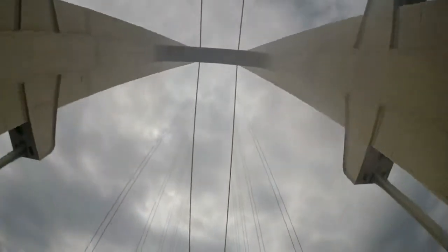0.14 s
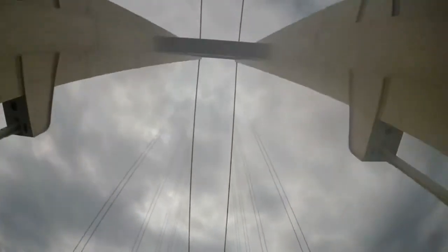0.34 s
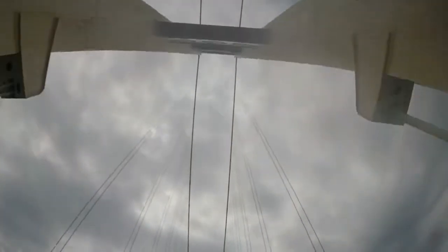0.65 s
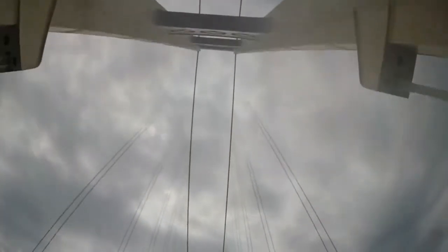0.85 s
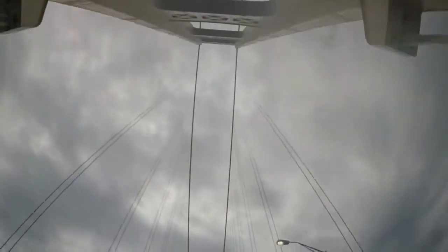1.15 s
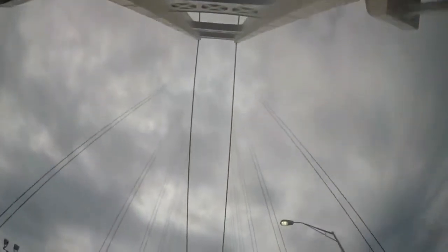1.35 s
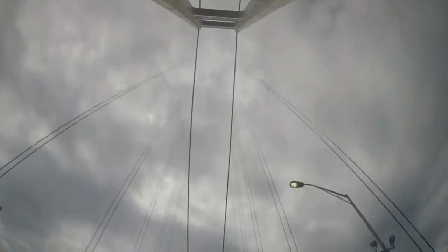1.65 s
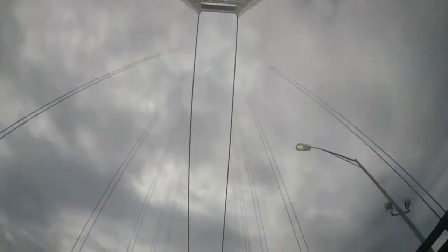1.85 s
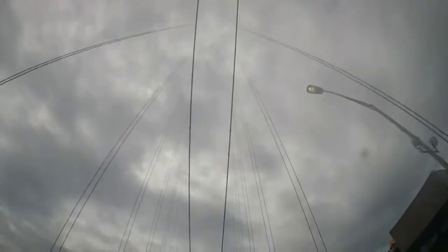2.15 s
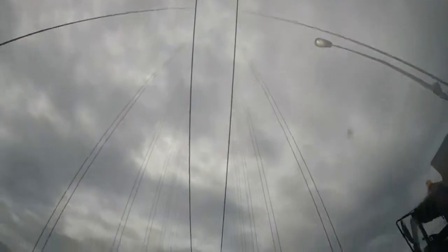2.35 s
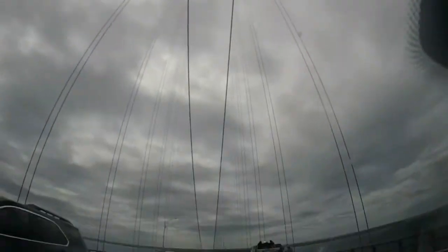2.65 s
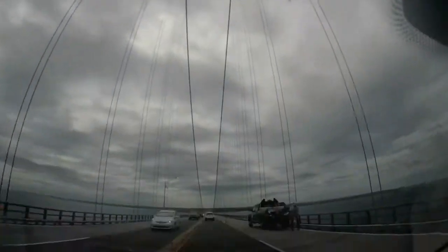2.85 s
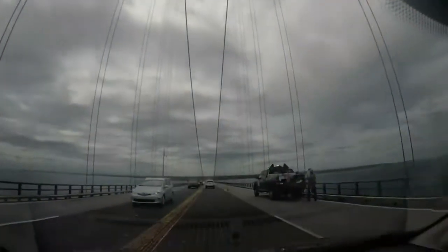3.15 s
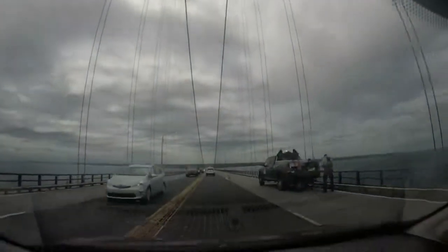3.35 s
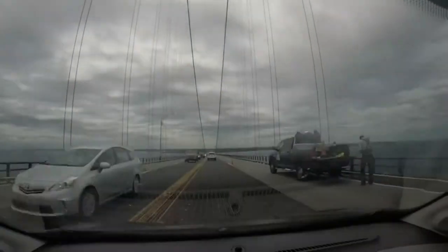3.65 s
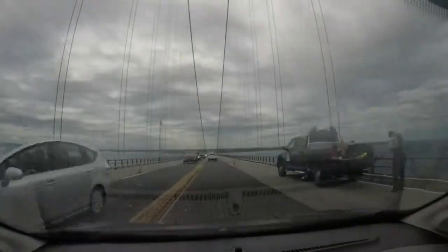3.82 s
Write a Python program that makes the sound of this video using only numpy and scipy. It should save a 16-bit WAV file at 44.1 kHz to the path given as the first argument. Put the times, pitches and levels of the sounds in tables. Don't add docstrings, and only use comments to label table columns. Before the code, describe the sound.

Low car road rumble on a bridge, heard inside the cabin, with sharp plastic clicks

```python
import sys
import numpy as np
from scipy import signal
from scipy.io import wavfile
from scipy.ndimage import uniform_filter1d

SR = 44100
rng = np.random.default_rng(int(sys.argv[2]) if len(sys.argv) > 2 else 0)


def master_out(mix):
    frames = np.transpose(np.atleast_2d(mix))
    ceiling = np.clip(frames, -1, 1)
    pcm = np.round(ceiling * 32767).astype(np.int16)
    wavfile.write(sys.argv[1], SR, pcm)


def voltage_ratio(level):
    return 10 ** (np.asarray(level, float) / 20)


N = 175518


def evened(x):
    return x / np.sqrt(np.mean(x ** 2) + 1e-20)


def curve(table, column, t):
    rows = np.array(table)
    return np.interp(t, rows[:, 0], rows[:, column])


def drift(top_hz, count):
    hz = np.geomspace(.5, top_hz, 24)[:, None]
    coarse_t = np.arange(0, N + 128, 64) / SR
    curves = []
    for _ in range(count):
        waves = np.sin(2 * np.pi * (hz * coarse_t + rng.random((24, 1)))) / np.sqrt(hz)
        curves.append(np.interp(np.arange(N) / SR, coarse_t, evened(waves.sum(0))))
    return curves


def noise(colour, lo_hz, hi_hz, patchy_db, flicker_db, size):
    frames, hz = 4 * N // size + 5, np.fft.rfftfreq(size, 1 / SR)
    real, imaginary, patches = rng.standard_normal((frames, len(hz), 3)).T
    patches = uniform_filter1d(patches, size=size // 128, axis=0)
    patches = evened(uniform_filter1d(patches, size=20, axis=1))
    flicker = evened(uniform_filter1d(rng.standard_normal(frames), size=4))
    colour_hz, colour_db = np.transpose(colour)
    shape = voltage_ratio(np.interp(np.log(hz + 1), np.log(colour_hz + 1), colour_db))
    inside = (hz >= lo_hz) & (hz <= hi_hz)
    share = np.sqrt((shape[inside] ** 2).sum() / (shape ** 2).sum())
    spectrum = (real + 1j * imaginary) * shape[:, None]
    spectrum = spectrum * voltage_ratio(patchy_db * patches + flicker_db * flicker)
    sound = signal.istft(spectrum, nperseg=size, noverlap=3 * size // 4)[1][:N]
    return evened(sound) / share


# pitch in Hz, level in dB, time to fade by 60 dB in seconds.
SHELL_TONES = [(290, -10, .015), (440, -6, 0.012), (767, 11, 0.0077), (1343, 0.5, 0.01), (1830, 9, 0.009),
               (2350, 0, 0.009), (2616, 3, 0.0096), (3350, -5, 0.011), (4420, 2.5, 0.0055),
               (5420, 1.5, 0.0053), (6770, -13.5, .006), (7900, -10.5, .004), (10130, -9.5, 0.0026),
               (12700, -29, .003)]


def shell(tilt_db, damp, shifts, top_db=0):
    t = np.arange(2600) / SR
    touch_s, top_hz = 0.00032, 6530
    ring = np.zeros(len(t))
    for k, ((hz, db, t60), shift) in enumerate(zip(SHELL_TONES, shifts)):
        tilt = tilt_db * np.log2(max(hz, 800) / 1800)
        top = top_db / (1 + (top_hz / hz) ** 8)
        fade = 60 * t / (t60 * damp)
        ring += voltage_ratio(db + tilt + top - fade) * np.sin(2 * np.pi * hz * shift * t + 3 * k)
    return (1 - np.exp(-t / touch_s)) ** 2 * ring


# time in seconds, level in dB.
HEAVE_LEVELS = [(0, -10), (.24, -9.5), (.28, -22), (.5, -15.5), (.56, -26.5), (.62, -12), (.95, -17.5),
                (1.1, -25), (1.6, -21), (1.8, -13.5), (2.0, -19), (2.5, -27), (2.7, -17), (2.85, -30.5),
                (3.2, -11.5), (3.4, -16.5), (3.56, -10), (3.7, -18.5)]
# pitch in Hz, level in dB per Hz.
THUD_COLOUR = [(15, -4), (40, 0), (70, -7), (100, -11.5), (140, -29.5), (300, -77.5)]


def heave():
    t = np.arange(N) / SR
    heave_hz, roughness, kick_db, thud_db = 25.95, 0.227, -10.5, -13
    pace, push = drift(top_hz=33.1, count=2)
    turns = 2 * np.pi * np.cumsum(heave_hz * (1 + roughness * pace)) / SR
    bounce = voltage_ratio(push) * np.sin(turns)
    kick = voltage_ratio(kick_db - 1.9 * push) * np.sin(1.7 * turns)
    thud = noise(THUD_COLOUR, 10, 200, patchy_db=2.5, flicker_db=1.0, size=2048)
    body = np.sqrt(2) * (bounce + kick) + voltage_ratio(thud_db) * thud
    return voltage_ratio(curve(HEAVE_LEVELS, 1, t) - 2) * body, push


# time in seconds, level in dB.
AIR_TOP = [(0, -11), (.45, -10), (.6, 0), (1.0, 3), (1.5, 3), (2.0, 0.5), (2.5, -4.5), (2.88, 0.5),
           (2.95, -8.5), (3.2, -14), (3.98, -16)]
# pitch in Hz, level in dB per Hz.
HISS_COLOUR = [(710, -16.5), (1200, 0), (2680, -28), (3090, -11), (4960, -18), (6680, -17), (10700, -30),
               (13000, -32), (14000, -32.5)]


def air_hiss(push):
    t = np.arange(N) / SR
    ring_db, top_hz = -8, 9500
    colour = HISS_COLOUR[:-1] + [(14500, -68.5)]
    hiss = noise(colour, 2000, 12000, patchy_db=3.0, flicker_db=0.2, size=512)
    still_shell = shell(tilt_db=-2.0, damp=1.1, shifts=np.ones(len(SHELL_TONES)))
    ringing = evened(signal.oaconvolve(hiss, still_shell)[:N])
    hiss = evened(hiss + voltage_ratio(ring_db) * ringing) * hiss.std()
    dull = signal.sosfiltfilt(signal.butter(4, top_hz, fs=SR, output="sos"), hiss)
    return dull + (hiss - dull) * voltage_ratio(curve(AIR_TOP, 1, t) + 3.3 * push)


# time in seconds, rumble in dB, tyre roar in dB, air hiss in dB.
ROAD_LEVELS = [(0.0, -38, -41, -68.5), (0.14, -30.5, -38, -61.5), (0.3, -43.5, -44.5, -70),
               (0.58, -40.5, -45, -64), (0.82, -46.5, -41.5, -57.5), (1.15, -39.5, -43.5, -62.5),
               (1.51, -34, -37, -58.5), (1.95, -31.5, -36, -52), (2.23, -34, -31, -47),
               (2.58, -31, -34, -47.5), (2.98, -32, -33.5, -49), (3.13, -28, -32.5, -50.5),
               (3.3, -31, -35.5, -54), (3.45, -35, -34, -55), (3.65, -36.5, -37, -59),
               (3.8, -34, -35, -58.5), (3.98, -33, -35.5, -65)]
# pitch in Hz, level in dB per Hz.
RUMBLE_COLOUR = [(12, -3), (35, -5.5), (70, -2), (115, -9.5), (149, -5.5), (185, -12.5), (230, -43),
                 (330, -70)]
# pitch in Hz, level in dB per Hz.
ROAR_COLOUR = [(120, -61), (200, -2.5), (420, 1.5), (457, -7.5), (602, -2.5), (802, -10.5), (1330, -13.5),
               (3500, -35), (4550, -50), (7700, -120)]


def road():
    t = np.arange(N) / SR
    body, push = heave()
    rumble = noise(RUMBLE_COLOUR + [(500, -97.5)], 120, 180, patchy_db=1.55, flicker_db=-1.64, size=4096)
    roar = noise(ROAR_COLOUR + [(6000, -95)], 330, 1500, patchy_db=1.5, flicker_db=.4, size=1024)
    out = body + voltage_ratio(curve(ROAD_LEVELS, 1, t) + 3) * rumble
    out += voltage_ratio(curve(ROAD_LEVELS, 2, t)) * roar
    return out + voltage_ratio(curve(ROAD_LEVELS, 3, t) + 0.5) * air_hiss(push)


# pitch in Hz, start in seconds, length in seconds, level in dB.
HUMS = [(148.4, 1.25, .35, -30), (149.3, 1.85, .25, -29), (150, 2.15, .8, -29),
        (243.6, 1.3, 0.69, -37.5), (299.3, 2, .3, -34.5), (189.4, 1.3, .45, -33.5),
        (1340, 3.4, .6, -50), (85.2, 0, 0.29, -28), (458, 1.98, 0.2, -36.5), (408, 2.4, 0.31, -42),
        (471, 2.25, .15, -36.5), (403, 2.9, .17, -36), (603, 1.95, .25, -43), (625, 1.3, 0.24, -42.5),
        (570, 1.75, 0.44, -44), (648, 2.1, 0.23, -43), (159, 3.3, .3, -33), (665, 2.9, 0.44, -45)]


def hums():
    out = np.zeros(N + SR)
    t = np.arange(SR) / SR
    width, edge_s = .07, .05
    shakes = rng.standard_normal((len(HUMS), 2, SR))
    for (hz, start, length, db), shake in zip(HUMS, shakes):
        r = np.exp(-np.pi * width * hz / SR)
        slow = signal.lfilter([1], [1, -2 * r, r * r], shake[0] + 1j * shake[1])
        steady = 1.2 * (hz < 700)
        tone = ((steady + slow / slow.std()) * np.exp(2j * np.pi * hz * t)).real
        swell = np.clip(np.minimum(t, length - t) / edge_s, 0, 1)
        out[round(start * SR):][:SR] += voltage_ratio(db) * evened(tone) * swell
    return out[:N]


# pitch in Hz, level in dB, time to fade by 60 dB in seconds.
MOUNT_TONES = [(1290, -37.5, .054), (2223, -35, 0.069), (3200, -40, 0.06), (4540, -41, 0.036),
               (5310, -39.5, 0.035)]
# start in seconds, peak in dB, brightness in dB per octave,
# spread of the contact in seconds, extra level above 6 kHz in dB.
SHELL_CLICKS = [(0.1501, -11, -0.5, .004, 12.5), (0.3023, 0, -5, .002, -6), (0.4087, -32.5, 0, .003, 0),
                (0.62, -29, -5, 0.0026, 6), (0.9907, 0.5, 2, 0.0023, -2), (1.265, -31, -14, .003, 0),
                (1.353, -34, -13, 0.0028, 0), (1.365, -28.5, -6, .002, 4), (1.393, -19, -7, 0.0046, -3),
                (1.419, -24, -10.5, .004, 0), (1.444, -25, -12, .004, 0), (1.462, -24, -10, 0.0023, 0),
                (1.5147, -9.5, 1, 0.0054, 4), (2.0607, -15, -6, .004, 4.5), (2.7731, -14, 2, 0.011, -0.5),
                (2.787, -26, 0, .006, 0), (1.556, -24, -7, .004, 1), (2.9099, -7.5, 4, .0015, -9),
                (2.992, -23, -2, .003, -3), (3.005, -21, -5, 0.0026, -2), (3.0203, -15, 1, .005, 0),
                (2.845, -24, 0, .006, -1), (3.368, -29, 2.5, 0.0037, 0)]


def clicks():
    lag_s, chatter, detune = 0.00073, .028, .03
    tail_db, tail_s = -30.5, 0.047
    out = np.zeros(N + 6000)
    luck = rng.random((len(SHELL_CLICKS), 20))
    fuzz = rng.standard_normal((len(SHELL_CLICKS), 2000))
    t = np.arange(2000) / SR
    for (start, db, tilt_db, spread, top_db), chance, rough in zip(SHELL_CLICKS, luck, fuzz):
        chattering = chatter * np.exp(-(t / abs(spread)) ** 4)
        touches = rough * (chattering + 0.3 * voltage_ratio(tail_db - 60 * t / tail_s))
        touches[0] = -1
        shifts = 1 + detune * (chance[:len(SHELL_TONES)] - .5)
        ring = np.convolve(touches, shell(tilt_db, 0.79, shifts, top_db))
        ring = ring / abs(ring).max()
        for hz, mount_db, t60 in MOUNT_TONES:
            tone = voltage_ratio(mount_db + 1.6 * tilt_db - 60 * t / t60) * np.sin(2 * np.pi * hz * t)
            ring[:2000] += tone * np.minimum(t / .003, 1)
        at = round((start + lag_s) * SR)
        out[at:at + len(ring)] += voltage_ratio(db) * ring
    return out[:N]


# time in seconds, turning rate in Hz, load in dB.
ENGINE_RUN = [(.8, 37, -60), (1.03, 46, -47.5), (1.2, 46.6, -41.5), (1.6, 46.8, -48), (2.0, 47.1, -34),
              (2.4, 47.7, -36), (2.85, 49.1, -38.5), (3.05, 50.4, -39.5), (3.45, 52.2, -44),
              (3.98, 53.2, -55.5)]
# time in seconds, level in dB.
CABIN_BOOM = [(0.8, -47), (0.93, -27.5), (1.01, -39), (1.09, -23), (1.15, -29), (1.66, -14.5),
              (1.91, -16.5), (1.99, -14), (2.56, -9), (2.65, -10.5), (2.69, -21), (3.01, -14.5),
              (3.03, -10), (3.28, -16.5), (3.46, -11), (3.64, -15), (3.94, -13), (3.98, -15.5)]
# multiple of the turning rate, level in dB.
ENGINE_TONES = [(1, -9), (3, 10), (4, 9), (5, -10), (6, -1), (7, -14), (8, -6), (9, -12.5), (10, -1.5),
                (11, -7), (12, -4), (13, -6), (16, -11.5)]
# pitch in Hz, width in Hz, lift in dB.
CABIN_LIFTS = [
    (149, 17, 6),
    (234.5, 5.9, 13.5),
    (614, 71, -3.5),
]
# multiple of the turning rate, start in seconds, length in seconds, lift in dB.
PANEL_SWELLS = [(6, 2.265, .62, 17.5), (6, 2.94, 0.535, 18.5), (6, 1.14, 0.98, 7), (4, 1.4, 0.23, 3.5),
                (4, 2.65, 0.21, 12), (4, 3.0, .45, 7.5), (8, 2.9, 0.2, 17), (10, 2.5, 0.4, 9),
                (16, 2.26, 0.43, 11.5), (5, 1.338, 0.54, 11), (3, 1.07, 0.77, 3.5), (4, 1.97, 0.34, 5.5),
                (12, 3.2, 0.5, 8), (10, 3.05, .45, 5), (12, 3.3, 0.81, 8.5), (8, 3.1, 0.55, 10)]


def engine():
    t = np.arange(N) / SR
    jitter, boom_waver_db, waver_db = .004, .6, 2.2
    engage_s, engage_rise_s, swell_edge_s = 0.76, 0.094, 0.047
    wander = drift(top_hz=14, count=len(ENGINE_TONES) + 2)
    hz = curve(ENGINE_RUN, 1, t) * (1 + jitter * wander[-2])
    turns = 2 * np.pi * np.cumsum(hz) / SR
    out = voltage_ratio(curve(CABIN_BOOM, 1, t) + boom_waver_db * wander[-1]) * np.sin(2 * turns)
    load = curve(ENGINE_RUN, 2, t) - 8
    for (multiple, db), waver in zip(ENGINE_TONES, wander):
        lift = np.zeros(N)
        for peak_hz, width, gain in CABIN_LIFTS:
            lift += gain / (1 + (2 * (multiple * hz - peak_hz) / width) ** 2)
        for sung, start, length, gain in PANEL_SWELLS:
            if sung == multiple:
                edges = np.minimum(t - start, start + length - t) / swell_edge_s
                lift += gain * np.clip(edges, 0, 1)
        out += voltage_ratio(load + db + lift + waver_db * waver) * np.sin(multiple * turns + 7 * multiple)
    return np.sqrt(2) * out * np.clip((t - engage_s) / engage_rise_s, 0, 1)


# start in seconds, length in seconds.
RUB_STROKES = [(1.335, .135), (1.518, .125), (2.7, .08), (2.772, .125), (2.975, .19), (3.3, .13),
               (3.0, 1.5)]
# level in dB, slipping grains per second.
RUB_GRAINS = [
    (-59.5, 2200),
    (-40, 10000),
    (-47, 13000),
    (-41, 3000),
    (-45, 4000),
    (-52.5, 11000),
    (-55.5, 12000),
]


def rubs():
    t = np.arange(N) / SR
    start_share, end_share = .07, .4
    luck = rng.random(N)
    sizes = rng.standard_normal(N) * voltage_ratio(3.34 * np.minimum(rng.exponential(1, N), 2.06))
    grains = np.zeros(N)
    for (start, length), (db, rate) in zip(RUB_STROKES, RUB_GRAINS):
        u = (t - start) / length
        stroke = np.clip(np.minimum(u / start_share, (1 - u) / end_share), 0, 1)
        slips = sizes * (luck < rate / SR) * np.sqrt(SR / rate)
        grains += voltage_ratio(db) * stroke * slips
    ring = shell(tilt_db=1.5, damp=.7, shifts=np.ones(len(SHELL_TONES)))
    ringing = signal.oaconvolve(grains, ring / np.linalg.norm(ring))[:N]
    band = signal.butter(2, [6000, 11500], "band", fs=SR, output="sos")
    return ringing + voltage_ratio(-19) * signal.sosfilt(band, grains)


def scene():
    return (road() + hums() + clicks() + engine() + rubs())[None]


def top_cut(x):
    return signal.sosfilt(signal.butter(12, 14650, fs=SR, output="sos"), x)


def record(dry):
    knee = .8
    room = .99 - knee
    over = np.maximum(abs(dry) - knee, 0)
    mix = np.sign(dry) * (np.minimum(abs(dry), knee) + room * np.tanh(over / room))
    return top_cut(mix)


dry = scene()
out = record(dry)
master_out(out)
```